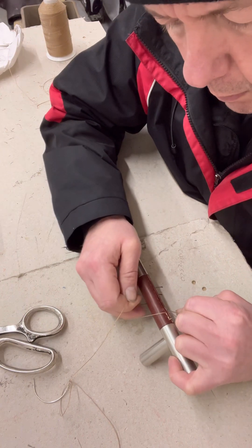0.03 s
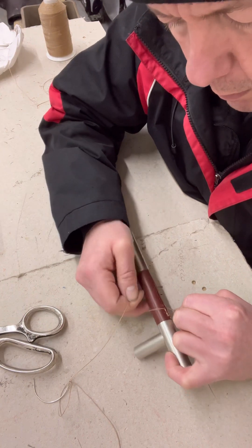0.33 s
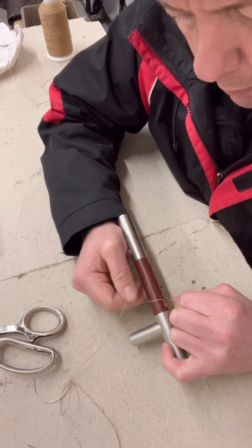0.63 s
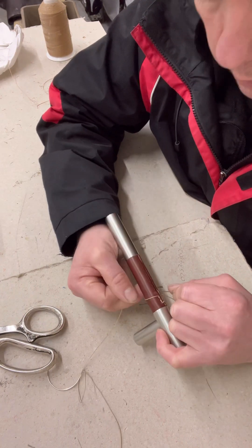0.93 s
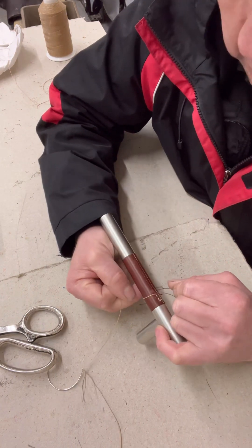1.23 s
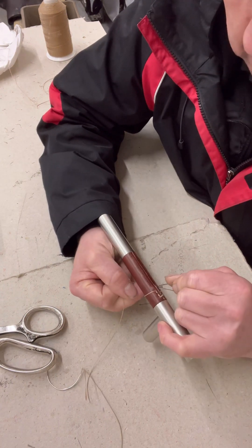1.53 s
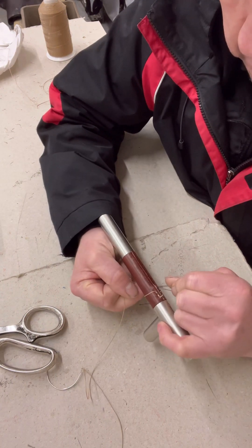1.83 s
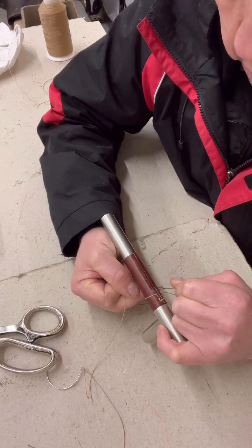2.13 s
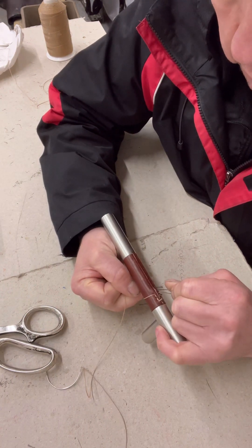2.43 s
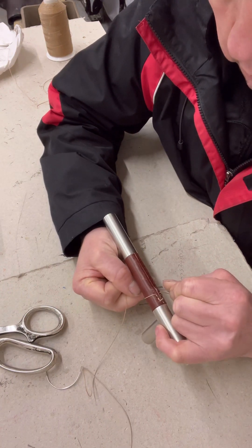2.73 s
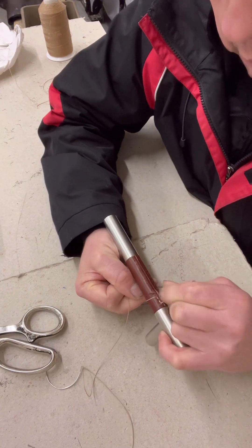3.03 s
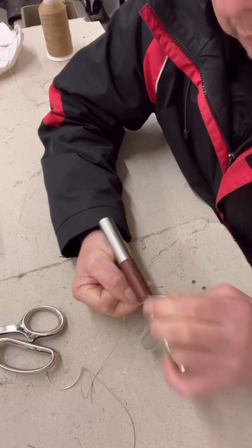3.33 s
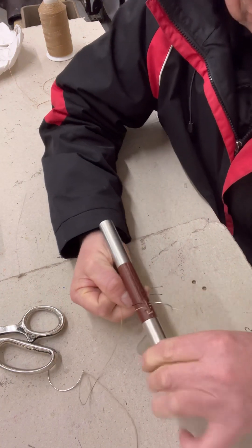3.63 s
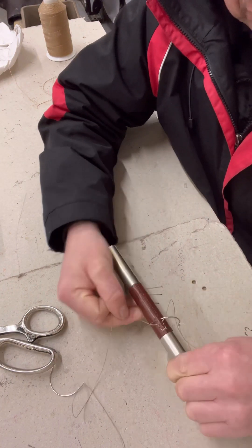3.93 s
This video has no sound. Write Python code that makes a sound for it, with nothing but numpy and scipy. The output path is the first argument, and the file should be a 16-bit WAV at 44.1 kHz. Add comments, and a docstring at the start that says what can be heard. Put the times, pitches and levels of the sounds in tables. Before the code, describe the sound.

Hands, sleeves and thread rustle faintly as leather is stitched around a metal handle, with small taps and ticks. After a lull the rustling resumes, and the handle knocks loudly on the worktable. Close up in a quiet, rumbling room.

```python
"""Close up, leather is stitched round a hollow metal handle on a worktable in a quiet, rumbling room.
Sleeves and hands rustle, thread hisses and small contacts tick and ping while a low hum swells.
Around one second a cuff slides over the open tube and sounds its air column; the hum then fades.
After a lull with arms rubbing on the table, the handwork picks up again. At the end the handle knocks
on the tabletop: a bending wave, treble first, then the boom of the room."""
import sys
import numpy as np
from scipy import signal
from scipy.fft import rfft, irfft
from scipy.io import wavfile
from scipy.ndimage import uniform_filter1d

SR = 44100
rng = np.random.default_rng(int(sys.argv[2]) if len(sys.argv) > 2 else 0)


def generate_wav(sig):
    """Save sig (samples, or channels by samples) to the path in sys.argv[1] as 16-bit PCM at SR."""
    pcm = np.round(np.clip(np.atleast_2d(sig).T, -1, 1) * 32767).astype(np.int16)
    wavfile.write(sys.argv[1], SR, pcm)


N = 176400

# envelopes of the hand movements, one list each: time_s, cloth_db, hiss_db
HAND_MOVES = [
    [(.19, -79, -105), (.235, -77, -92), (.275, -61, -77), (.33, -68.5, -77.5), (.37, -68, -73.5),
     (.46, -65, -75.5), (.52, -68.5, -76), (.56, -74.5, -96), (.6, -83, -100)],
    [(.6, -75, -100), (.62, -70, -74), (.655, -75, -75), (.69, -70, -84), (.77, -61, -82),
     (.83, -61.5, -80), (.91, -66, -94), (.99, -64.5, -81), (1.05, -67, -95), (1.16, -71.5, -100),
     (1.25, -66, -89), (1.36, -63.5, -88), (1.43, -74.5, -96), (1.55, -79, -102)],
    [(2.38, -90, -108), (2.47, -72, -90), (2.51, -79, -91), (2.56, -75, -100), (2.62, -90, -108)],
    [(2.79, -80, -104), (2.825, -72.5, -83), (2.855, -56.5, -76), (2.9, -69.5, -89), (2.95, -68, -96),
     (2.99, -60, -74), (3.05, -66, -82), (3.11, -72, -90), (3.18, -69, -83), (3.22, -70, -95)],
    [(3.22, -70.5, -89), (3.27, -64, -82), (3.31, -68, -73), (3.37, -65.5, -84), (3.48, -74, -90),
     (3.6, -66.5, -81.5), (3.69, -64.5, -84), (3.81, -54.5, -69.5), (3.87, -56, -75.5), (4, -58, -79.5)],
]
# broad resonance of the cloth, one row per movement: centre_hz, boost_db, trim_db
MOVE_EQ = [(2260, 3.5, -2), (750, 2.5, -.5), (4220, 3, -1.5), (1090, 1.5, -1.5), (1800, 0.5, 0)]
# colour of the rustle, with a band near 9 kHz cut out: frequency_hz, gain_db
RUSTLE_EQ = [(150, 2), (350, 0), (600, 1), (900, 1), (1200, -1), (1800, 0.5), (2800, -2), (3500, -4),
             (4800, -4.5), (6300, -6), (7200, -16.5), (8100, -12.5), (9000, -84), (16000, -56)]
# colour of the high hiss and ticks, with a band near 9 kHz cut out: frequency_hz, gain_db
HIGH_HISS_EQ = [(3000, -16), (7500, 0), (9200, -27), (10800, -5), (13000, -4), (15500, 2)]
# taps of fingers, thread and handle: start_s, body_hz, body_db, snap_db, tick_db
TAP_CUES = [(0.379, 417, -55, -69, -92), (0.612, 600, -86, -68, -59), (0.749, 1080, -56, -54, -85),
            (.781, 885, -56, -59.5, -90), (1.266, 805, -54, -83, -94), (1.479, 590, -59.5, -72, -75),
            (2.068, 477, -59.5, -66, -87), (2.839, 453, -56, -63, -84), (2.852, 700, -58, -76, -82),
            (2.965, 400, -56.5, -62.5, -74), (2.988, 420, -58, -78, -75), (3.126, 400, -83, -86, -70),
            (3.504, 426, -60.5, -87, -68), (3.532, 790, -65, -78, -92)]
# colour of snaps and of the rattle: frequency_hz, gain_db
SNAP_EQ = [(500, -6), (1500, -0.5), (2500, 3), (4000, -14), (6500, -14.5), (9000, -30.5), (15000, -63.5)]
# pings of needle and tube: start_s, pitch_hz, level_db, t60_s
PING_CUES = [(.612, 6300, -65, .06), (.781, 892, -54.5, 0.079), (2.069, 2740, -72.5, 0.08),
             (3.53, 855, -54.5, 0.036), (3.53, 3410, -61, 0.032)]
# air column of the open tube: pitch_hz, width_hz, gain_db
TUBE_MODES = [(900, 99, 1), (1610, 490, 0), (2510, 200, -2.5), (3415, 330, 4), (4160, 520, 1),
              (5090, 320, -7.5)]
# envelope of the cuff on the tube's mouth: time_s, level_db
CUFF_ENVELOPE = [(.68, -90), (.78, -73), (.9, -67.5), (.99, -63), (1.12, -71.5), (1.28, -74.5), (1.45, -85)]
# ringing modes of the tabletop: pitch_hz, level_db, t60_s
TABLETOP_MODES = [(85, -18.8, .3), (143, -1.8, .051), (252, -1, .039), (341, -9.3, .048),
                  (400, -14.2, .057), (450, -29, .18), (649, -24, .1), (1030, -28, .012), (1480, -27, .012),
                  (2030, -26, .02), (3400, -34, .012), (5500, -46, .012)]
# colour of the knock's ring on the tabletop: frequency_hz, gain_db
KNOCK_EQ = [(60, 0.5), (130, -1.4), (250, 0), (470, 0), (550, -9), (650, -1.5), (780, -9), (1000, 2),
            (1300, -16.5), (1600, 0.5), (2050, -1.5), (2600, -19.5), (3400, 2.5), (4600, -6), (6000, 1)]
# colour of the knock's crack: frequency_hz, gain_db
CRACK_EQ = [(400, -12), (750, -6), (1000, -1), (2000, 1), (2600, -16), (3500, -11.5), (4800, -16.5),
            (6200, -20), (7300, -40.5), (12000, -36), (15000, -45)]
# colour of the room's answer to the knock: frequency_hz, gain_db
BOOM_EQ = [(20, -39), (45, -20.5), (80, 2.5), (130, -2), (200, -1.5), (280, 2.5), (450, -5.5), (620, -12.5),
           (780, -25), (1400, -28), (2100, -27.5), (2900, -35), (4400, -45), (6500, -64.5), (8500, -66.5),
           (15000, -83)]
# envelope of arms rubbing on the tabletop: time_s, level_db
ARM_ENVELOPE = [(0, -76.5), (.7, -70.5), (1.3, -64), (1.52, -73), (1.65, -61.5), (1.85, -66.5),
                (2.1, -69.5), (2.4, -90.5), (2.78, -74.5), (2.87, -59.5), (3.1, -67.5), (3.3, -65),
                (3.5, -73.5), (3.85, -65)]
# dull colour of that rubbing: frequency_hz, gain_db
ARM_EQ = [(90, -22.5), (190, 0), (290, 2.5), (360, -9.5), (500, -14.5), (800, -26.5), (2000, -31),
          (4000, -41), (9000, -60)]
# colour of the room rumble: frequency_hz, gain_db
RUMBLE_EQ = [(12, -49), (20, -14.5), (59, 4), (106, -3), (137, -9), (191, -14), (213, -23), (289, -21),
             (439, -37.5), (614, -32), (746, -44.5), (2760, -48.5), (3260, -55), (6020, -55), (8640, -69),
             (15500, -62.5)]
# swell and fade of the low hum: time_s, level_db
HUM_ENVELOPE = [(0, -76), (.25, -55), (.45, -51), (.8, -49.5), (1.35, -48.5), (1.65, -56), (2.2, -55.5),
                (4, -70.5)]
# stereo width of the close sounds, side against mid: frequency_hz, side_db
HAND_WIDTH = [(200, -22.5), (700, 0), (1300, -6), (2400, -4.5), (4400, -11.5), (6500, -1.5), (8100, 13.5),
              (11000, 10.5), (15000, -30)]
# stereo width of the boom: frequency_hz, side_db
BOOM_WIDTH = [(60, -27.5), (200, -23), (380, -6.5), (700, 0), (1300, -3), (4400, -6.5)]
# stereo width of rumble and arms: frequency_hz, side_db
ROOM_WIDTH = [(60, -46), (110, -27.5), (200, -17), (380, -2.5), (700, 6), (2400, -0.5), (4400, -7),
              (8100, 9.5), (15000, -5)]

BIN_HZ = np.arange(N // 2 + 1) * SR / N


def stitching_rustle(t):
    """Sleeves and hands rub and the thread hisses; each movement gives the cloth its own colour."""
    cloth_trim_db, hiss_trim_db, flutter_db = -2.5, 3.5, 0.84
    fade_db_per_s, bell_octaves = 1000, 0.54
    rub_spectrum = rfft(stereo(fibres, RUSTLE_EQ, HAND_WIDTH))
    cloth, hiss_envelope = 0, 0
    for move, (centre_hz, boost_db, trim_db) in zip(HAND_MOVES, MOVE_EQ):
        time_s, cloth_db, hiss_db = np.array(move).T
        outside_move_s = np.abs(t - np.clip(t, time_s[0], time_s[-1]))
        fade_db = -fade_db_per_s * outside_move_s
        bell = np.exp(-np.log2((BIN_HZ + 1) / centre_hz) ** 2 / (2 * bell_octaves ** 2))
        rub = irfft(rub_spectrum * gain(trim_db + boost_db * bell), N)
        cloth += rub * gain(np.interp(t, time_s, cloth_db) + fade_db)
        hiss_envelope = np.maximum(hiss_envelope, gain(np.interp(t, time_s, hiss_db) + fade_db))
    flutter = gain(flutter_db * wander(rate_hz=76))
    hiss = hiss_envelope * stereo(fibres, HIGH_HISS_EQ, HAND_WIDTH)
    return flutter * (gain(cloth_trim_db) * cloth + gain(hiss_trim_db) * hiss)


def fibres():
    """Fibres catch and slip: tiny uneven clicks over a smooth rub."""
    slips_per_s, spread_db, slip_share = 1100, 1.5, 0.32
    slips = (rng.random(N) < slips_per_s / SR) * np.sign(noise())
    slips *= gain(spread_db * np.minimum(rng.exponential(size=N), 2 * np.e))
    return np.sqrt(slip_share) * unit_rms(slips) + np.sqrt(1 - slip_share) * noise()


def handle_knock(t):
    """The handle hits the table: the top rings with a crack, the room booms, a short rattle follows."""
    knock_s, crack_s, rattle_s, predelay_s = 3.87219, 3.879, 3.92, 0.0062
    delayed_wave = np.r_[np.zeros(round(knock_s * SR)), bending_wave(t)][:N]
    thud = delayed_wave * np.clip((t - knock_s) / 0.004, 0, 1)  # 4 ms fade-in
    crack = stereo(noise, CRACK_EQ, HAND_WIDTH) * decay(t - crack_s, t60_s=0.028, rise_s=0.00042)
    boom = stereo(noise, BOOM_EQ, BOOM_WIDTH) * decay(t - knock_s - predelay_s, t60_s=0.52, rise_s=0.012)
    rattle = stereo(noise, SNAP_EQ, HAND_WIDTH) * decay(t - rattle_s, t60_s=0.04, rise_s=0.0016)
    return gain(0.5) * thud + gain(-24) * crack + gain(-21) * boom + gain(-45) * rattle


def bending_wave(t):
    """Tabletop waves run faster with pitch up to a knee, so treble leads; the handle bounces once."""
    travel_s_at_1_hz, knee_hz, low_cut_hz, high_cut_hz = 0.1847, 1500, 66, 5800
    bounce_s, bounce_db, bounce_cut_hz = 0.0415, -14, 600
    ring = sum(gain(db) * np.exp(-np.log(1000) * t / t60_s) * np.sin(2 * np.pi * hz * t)
               for hz, db, t60_s in TABLETOP_MODES)
    below_knee = 2 * np.sqrt(np.minimum(BIN_HZ, knee_hz))
    above_knee = np.maximum(BIN_HZ - knee_hz, 0) / np.sqrt(knee_hz)
    dispersion = np.exp(-2j * np.pi * travel_s_at_1_hz * (below_knee + above_knee))
    band = BIN_HZ ** 6 / (BIN_HZ ** 6 + low_cut_hz ** 6) / (1 + (BIN_HZ / high_cut_hz) ** 12)
    hit = -rfft(equalise(ring, KNOCK_EQ)) * dispersion * band
    bounce = gain(bounce_db) * np.exp(-2j * np.pi * BIN_HZ * bounce_s)
    bounce /= 1 + (BIN_HZ / bounce_cut_hz) ** 2
    return irfft(hit * (1 + bounce), N)


def small_taps(t):
    """Fingers, thread and handle tap: a dull body, a snap and a fine tick, with a touch of room."""
    snap = stereo(noise, SNAP_EQ, HAND_WIDTH)
    tick = stereo(noise, HIGH_HISS_EQ, HAND_WIDTH)
    skirt = 2 ** 1.72  # the body's EQ points lie 1.72 octaves apart
    taps = 0
    for start_s, hz, body_db, snap_db, tick_db in TAP_CUES:
        age_s = t - start_s
        body_eq = [(hz / skirt ** 2, -70), (hz / skirt, -28), (hz, 0),
                   (hz * skirt, -28), (hz * skirt ** 2, -70)]
        body = gain(body_db) * stereo(noise, body_eq, HAND_WIDTH)
        click = gain(snap_db) * snap + gain(tick_db) * tick
        room_tail = gain(-21.5) * decay(age_s, t60_s=0.25, rise_s=0.01)
        taps += body * (decay(age_s, t60_s=0.041, rise_s=0.0008) + room_tail)
        taps += click * (decay(age_s, t60_s=0.045, rise_s=0.0004) + room_tail)
    return taps


def metal_pings(t):
    """Needle and tube ring for a moment after each light contact."""
    return sum(gain(db) * decay(t - start_s, t60_s, rise_s=0.0005)
               * np.sin(2 * np.pi * hz * (t - start_s)) for start_s, hz, db, t60_s in PING_CUES)


def cuff_on_tube(t):
    """The cuff rubs the open end of the hollow handle and sounds its air column."""
    resonance = sum(gain(db) / (1 + 2j * (BIN_HZ - hz) / width_hz) ** 2
                    for hz, width_hz, db in TUBE_MODES)
    air = stereo(lambda: irfft(rfft(fibres()) * resonance, N),
                 eq=[(200, -20), (700, 6), (6000, 0), (9000, -20)], width=HAND_WIDTH)
    return air * gain(np.interp(t, *np.transpose(CUFF_ENVELOPE), left=-130, right=-130))


def arms_on_table(t):
    """Forearms and fists shift on the tabletop with a dull, uneven rub."""
    level_db = np.interp(t, *np.transpose(ARM_ENVELOPE)) + 3.3 * wander(rate_hz=25.7)
    return gain(level_db) * stereo(fibres, ARM_EQ, ROOM_WIDTH)


def room_tone(t):
    """A bed of steady rumble, with a low hum that swells and fades and a faint wavering whine."""
    rumble = gain(-51 + 0.3 * wander(rate_hz=5.29)) * stereo(noise, RUMBLE_EQ, ROOM_WIDTH)
    hum = gain(np.interp(t, *np.transpose(HUM_ENVELOPE))) * wavering_tone(pitch_hz=106.3, drift=0.0029)
    whine = gain(-82.5 + 0.9 * wander(rate_hz=20)) * wavering_tone(pitch_hz=597.5, drift=0.0054)
    return rumble + hum + whine


def wavering_tone(pitch_hz, drift):
    """A sine of rms 1 that strays by about the fraction drift of its pitch."""
    hz = pitch_hz * (1 + drift * wander(rate_hz=11))
    return np.sqrt(2) * np.sin(2 * np.pi * np.cumsum(hz) / SR)


def stereo(source, eq, width):
    """Two draws of a source, equalised as a mid of rms 1 and a side, mixed to left and right."""
    mid = unit_rms(equalise(source(), eq))
    side = equalise(unit_rms(equalise(source(), eq)), width)
    return np.array([mid + side, mid - side])


def equalise(x, eq):
    """Filter along a curve of (frequency_hz, gain_db) points."""
    hz, db = np.transpose(eq)
    return irfft(rfft(x) * gain(np.interp(np.log(BIN_HZ + 1), np.log(hz), db)), N)


def wander(rate_hz):
    """Smooth random modulation with a spread near 1."""
    hold = int(SR / rate_hz)
    steps = np.repeat(rng.standard_normal(N // hold + 1), hold)
    return 1.34 * uniform_filter1d(uniform_filter1d(steps, hold), hold)[:N]


def decay(age_s, t60_s, rise_s):
    """Percussive envelope: a quick attack at age 0, then an exponential fall."""
    age_s = np.maximum(age_s, 0)
    fall = np.exp(-np.minimum(np.log(1000) * age_s / t60_s, 10 * np.pi))
    return (1 - np.exp(-age_s / rise_s)) * fall


def noise():
    return rng.standard_normal(N)


def gain(db):
    return 10 ** (np.asarray(db) / 20)


def unit_rms(x):
    return x / np.sqrt(np.mean(x ** 2))


def scene():
    """Lay the handwork and the closing knock over the room tone."""
    t = np.arange(N) / SR
    return (room_tone(t) + stitching_rustle(t) + cuff_on_tube(t) + arms_on_table(t)
            + small_taps(t) + metal_pings(t) + handle_knock(t))


def record(dry):
    """A steep low-pass takes off the very top."""
    cutoff_hz = 15800
    return signal.sosfilt(signal.ellip(10, 0.1, 80, cutoff_hz, fs=SR, output="sos"), dry)


dry = scene()
out = record(dry)
generate_wav(out)
```